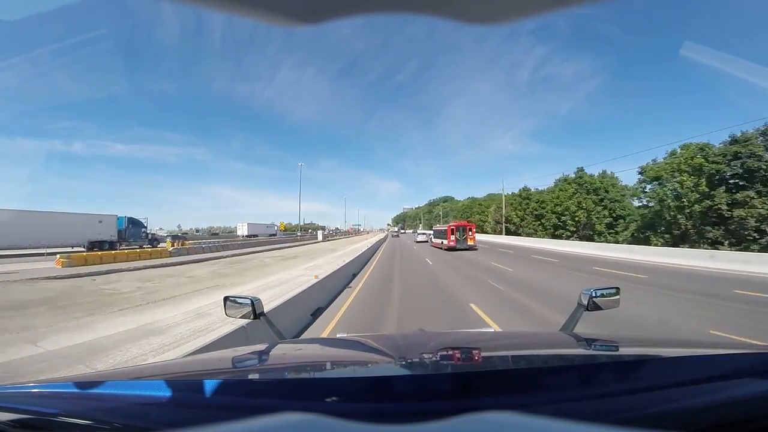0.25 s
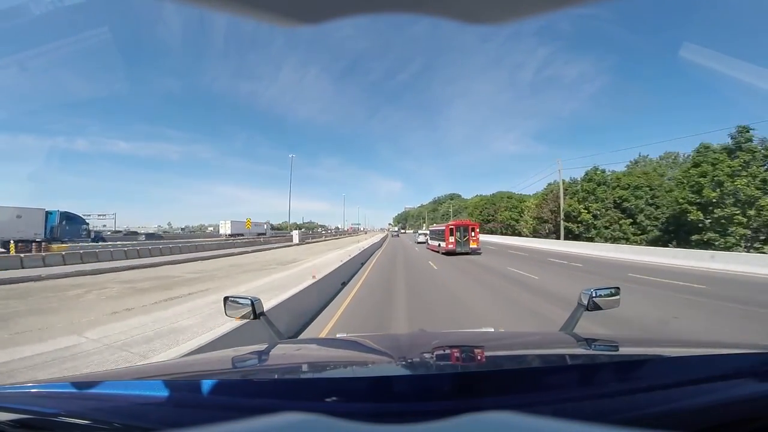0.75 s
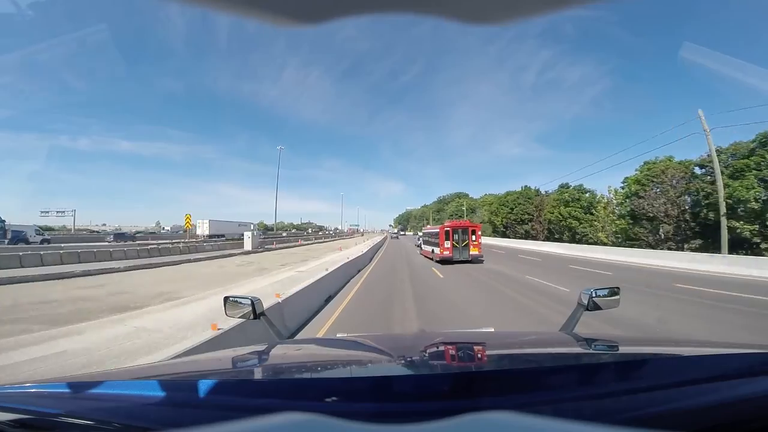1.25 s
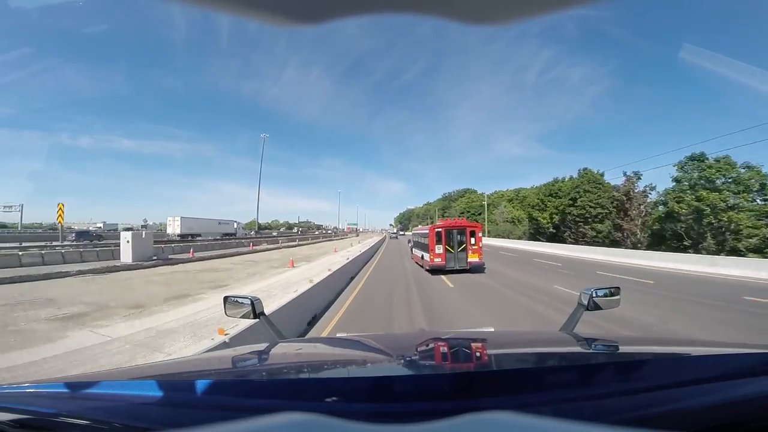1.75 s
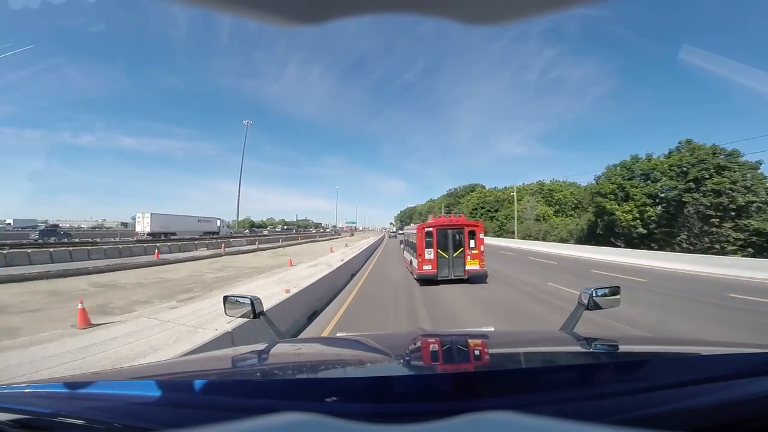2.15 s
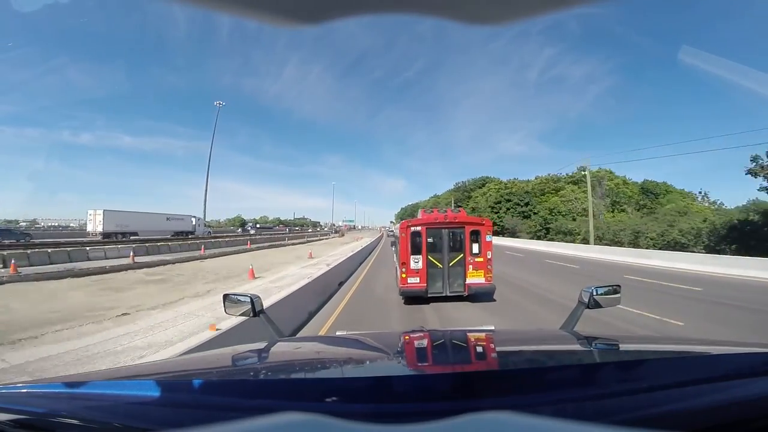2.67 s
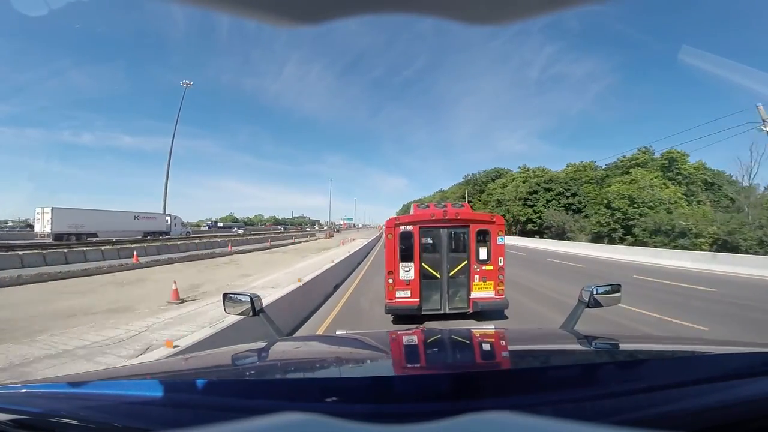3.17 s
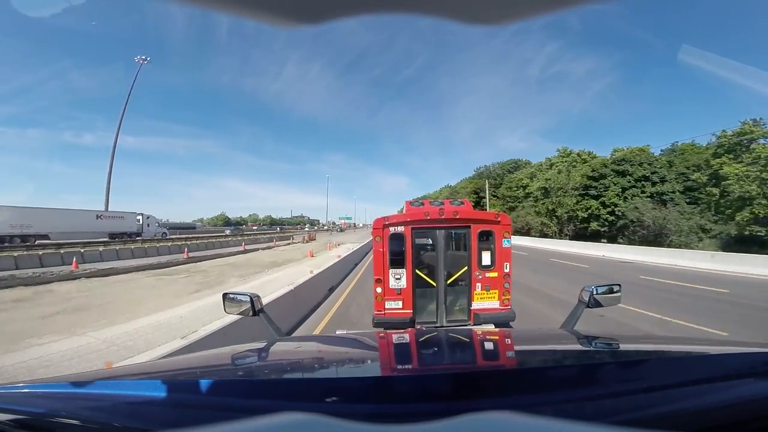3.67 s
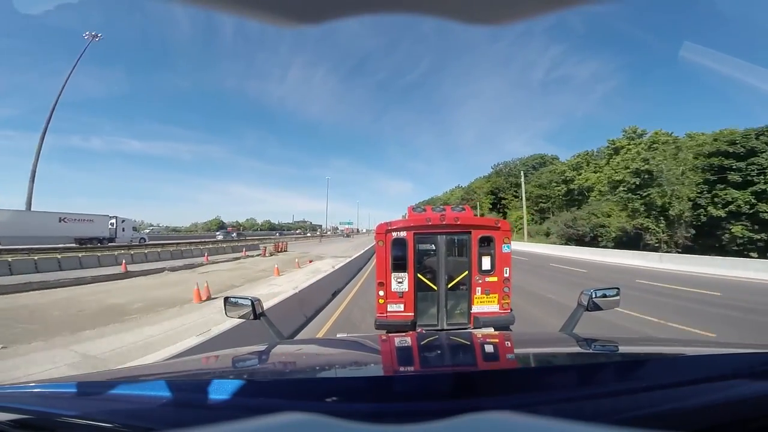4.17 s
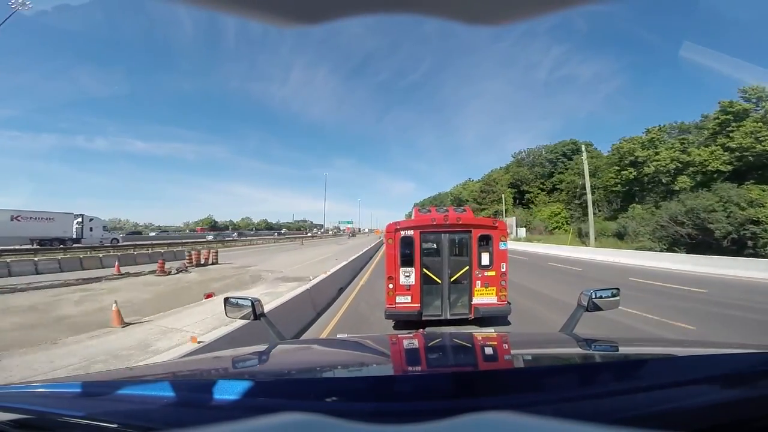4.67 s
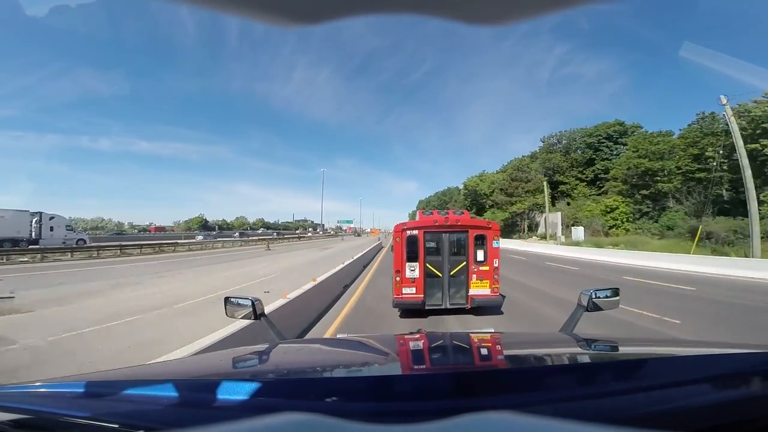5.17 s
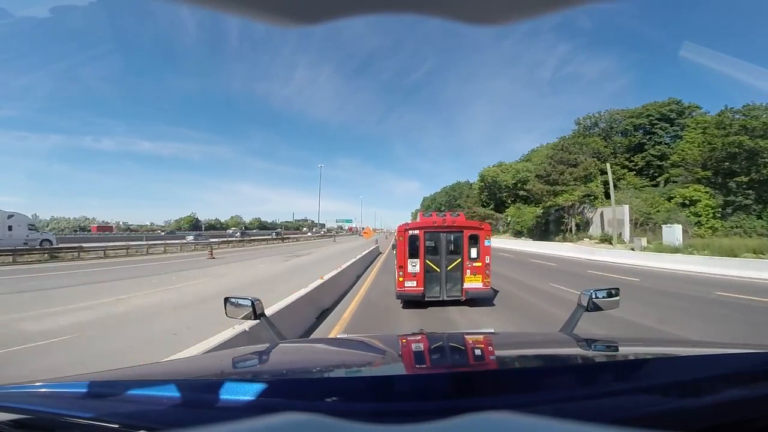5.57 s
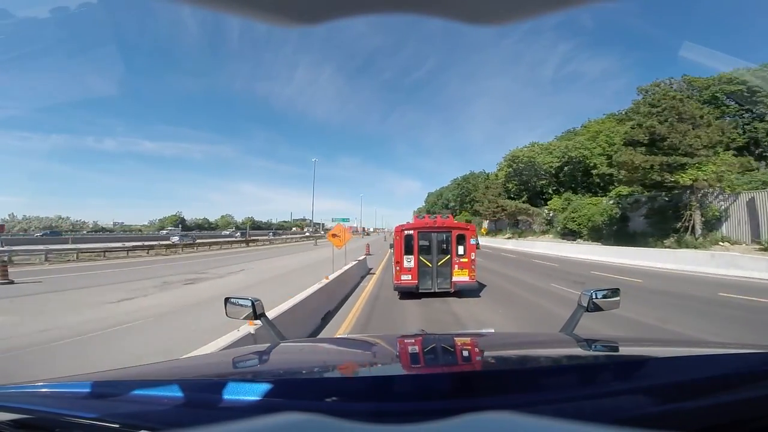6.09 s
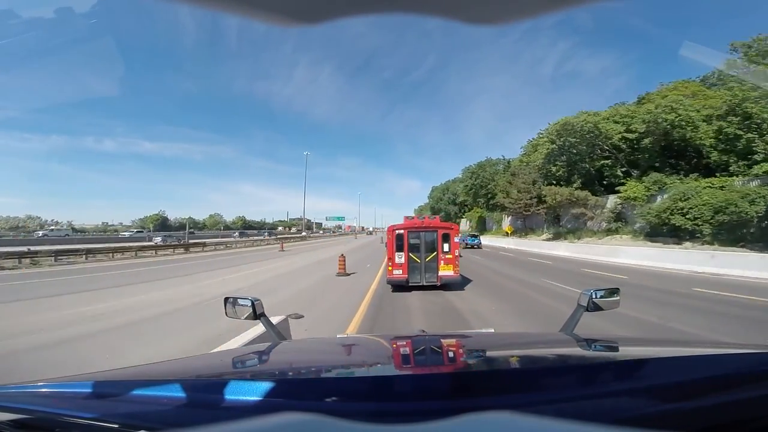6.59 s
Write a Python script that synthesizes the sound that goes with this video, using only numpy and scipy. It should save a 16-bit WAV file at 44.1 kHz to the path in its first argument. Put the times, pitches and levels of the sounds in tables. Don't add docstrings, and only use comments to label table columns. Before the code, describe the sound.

Low, bassy highway rumble fills a closed truck cab, with soft thumps of air over bumps. Brakes give a faint squeak, a valve spits, and the roof horn chirps higher for an instant before locking onto a long, buzzing mid-pitched blast. A small chassis knock and chirp sit beneath it. The horn stops abruptly with an airy vent; engine and road return, close to the microphone.

```python
import sys
import numpy as np
from scipy import signal
from scipy.io import wavfile

SR = 44100
rng = np.random.default_rng(int(sys.argv[2]) if len(sys.argv) > 2 else 0)


def transcribe(u):
    v = np.clip(np.atleast_2d(u).T, -1, 1)
    q = np.round(v * 32767).astype(np.int16)
    wavfile.write(sys.argv[1], SR, q)


def makeup_ratio(level_db):
    decades = np.asarray(level_db, float) / 20
    return 10 ** decades


N = 301644
TIME = np.arange(N) / SR
VALVE_OPENS_S, NOTE_LOCKS_S, VALVE_SHUTS_S, NOTE_ENDS_S = 1.705, 1.747, 5.37, 5.525


def rms_one(x):
    return x / np.sqrt(np.mean(x ** 2) + 1e-20)


def in_time(rows):
    s, *columns = np.transpose(rows)
    return [np.interp(TIME, s, c) for c in columns]


def drift(rate):
    r = np.exp(-128 * np.pi * rate / SR)
    sparse = rng.standard_normal(N // 64 + 2002)
    slow = signal.lfilter([1], [1, -2 * r, r * r], sparse)[2000:]
    return np.interp(np.arange(N) / 64, np.arange(len(slow)), rms_one(slow))


def band(x, low_hz, high_hz, order=2):
    return signal.sosfilt(signal.butter(order, [low_hz, high_hz], "band", fs=SR, output="sos"), x)


def narrow_noise(hz, width_hz):
    r = np.exp(-np.pi * width_hz / SR)
    poles = [1, -2 * r * np.cos(2 * np.pi * hz / SR), r * r]
    return rms_one(signal.lfilter([1, 0, -1], poles, rng.standard_normal(N)))


def noise_bands(spectrum, low_hz, patchy_db):
    white, together = rng.standard_normal((2, N)), drift(5.3)
    hz_points, db_points = np.transpose(spectrum)
    edges = np.geomspace(low_hz, 17000, round(3 * np.log2(17000 / low_hz)))
    for k, (low, high) in enumerate(zip(edges, edges[1:])):
        hz = np.sqrt(low * high)
        level_db = np.interp(np.log(hz), np.log(hz_points), db_points)
        flicker_db = patchy_db * (0.76 * together + drift(9))
        yield hz, makeup_ratio(level_db + flicker_db) * band(white[k % 2], low, high)


def tone(row, partials=((1, 0),), rise=.3, fall=.4, glide=1, rough_db=0):
    edge_db = 26
    s, length, from_hz, to_hz, top_db = row
    span = slice(int(s * SR), int((s + length) * SR))
    part = (TIME[span] - s) / length
    under = np.clip(np.maximum(1 - part / rise, 1 - (1 - part) / fall), 0, 1)
    hz = np.interp(part, [0, glide], [from_hz, to_hz])
    phase = 2 * np.pi * np.cumsum(hz) / SR + 0.16 * rough_db * drift(70)[span]
    level = np.sqrt(2) * makeup_ratio(top_db - edge_db * under + rough_db * drift(90)[span])
    out = np.zeros(N)
    out[span] = level * sum(makeup_ratio(db) * np.sin(k * phase) for k, db in partials)
    return out


def horn(fade_db=1.4, flicker_db=0.0791, swing=0.39, spread=.075):
    # multiple, level/dB, lean/(dB/s), crossing t/s, gain/dB
    overtones = [(1, -12, 0.7, 5.2, -2), (2, -34, -2.5, 2.7, -7), (3, -38, -5.0, 5.2, 15),
                 (4, -29, -2.1, 1.9, -4), (5, -28, -1.8, 4.5, -7), (6, -29, -2.5, 2.2, -6),
                 (7, -28, -1.5, 2.7, -4), (8, -23, -0.5, 3.6, -4), (9, -45, -0.1, 2.2, 12),
                 (10, -36, 1.9, 2.3, -4), (11, -47, 7.2, 2.1, 21), (12, -38, -0.7, 5.1, -8),
                 (13, -42, 0.9, 3.1, 4), (14, -40, -0.1, 3.3, 3), (15, -47, -1.4, 2.7, 4),
                 (16, -49, -3.0, 2.4, 2), (17, -43, -0.8, 4.7, -17), (18, -51, 0.9, 1.9, 9),
                 (19, -46, 0.0, 3.6, 4), (20, -50, 4.5, 2.1, 11), (21, -50, -2.3, 2.1, -8),
                 (22, -50, 1.5, 5.2, -4), (23, -52, 1.6, 5.0, -13), (24, -59, -1.7, 2.8, 2)]
    # t/s, level/dB
    blow = [
        (1.78, -10),
        (2.05, -13.5),
        (2.39, -11.5),
        (2.59, -13),
        (4.1, -11),
        (4.2, -12),
        (4.61, -11),
        (5.28, -13),
        (5.34, -11.5),
    ]
    # multiple, level/dB
    bright = [(25, 3), (28, 3), (31, 6), (32, 4), (33, 5), (35, 12), (44, 4), (46, 3), (47, 3), (49, 8)]
    # f/Hz, level/(dB per Hz)
    air = [(800, -2), (1500, -5.5), (2500, -8), (4000, -17), (6000, -19.5), (8500, -29), (12000, -37),
           (15300, -36)]
    closest_s, near_s = 3.6, .5
    hiss_db = -39.5

    span = slice(int(VALVE_OPENS_S * SR), int(NOTE_ENDS_S * SR))
    t = TIME[span]
    early, late = np.maximum(NOTE_LOCKS_S - t, 0), np.maximum(t - VALVE_SHUTS_S, 0)
    hz = 284.45 - .22 * (t - t[0])
    hz = hz + 260 * np.maximum(1.77 - t, 0)
    hz = hz + 19 * np.minimum(late / .12, 1)
    phase = 2 * np.pi * np.cumsum(hz) / SR
    phase = phase + .007 * drift(60)[span]

    upper = []
    first = len(overtones) + 1
    for k in range(first, 54):
        upper.append((k, -60 - 14 * np.log2(k / first) + dict(bright).get(k, 0), 0, 0, 0))

    def gate_db(k):
        return -330 * k ** 0.55 * early - 83 * k ** 0.75 * late

    note = 0
    for k, db, lean, crossing, near_db in list(overtones) + upper:
        scatter = .06 if k < 9 else 1
        lag = 2 * np.pi * (spread * k * k + scatter * rng.random())
        wander_db = fade_db * min(np.log(k) / 2, 1.2) * drift(3.07)[span]
        wander_db = wander_db + flicker_db * min(k, 24) * drift(26)[span]
        echo_db = near_db * np.exp(-((t - crossing) / near_s) ** 2)
        held_db = db + lean * (t - closest_s) + echo_db + wander_db
        if k == 1:
            held_db = in_time(blow)[0][span]
        echo_phase = swing * drift(1.0)[span] * (k > 1)
        note = note + makeup_ratio(held_db + gate_db(k)) * np.cos(k * phase - lag + echo_phase)

    hiss = rms_one(sum(noise for _, noise in noise_bands(air, 850, patchy_db=1.7)))[span]
    hiss = hiss * (1 + 0.11 * np.cos(phase))
    edge = np.minimum(np.arange(len(phase)), np.arange(len(phase))[::-1]) / (.015 * SR)
    out = np.zeros(N)
    out[span] = (-np.sqrt(2) * note + makeup_ratio(hiss_db + gate_db(14)) * hiss) * np.clip(edge, 0, 1)
    return out


def horn_transients():
    # t/s, length/s, start f/Hz, end f/Hz, level/dB
    overblow = (1.700, .066, 782, 754, -7.5)
    overblow_high = (1.701, .035, 2000, 1900, -22)
    overblow_mid = (1.708, .057, 1220, 1185, -25)
    sag_third = (5.35, .1, 850, 892, -22.5)
    sag_second = (5.36, .1, 565, 592, -24)
    fighting = tone(overblow_high, rise=.25, fall=.5, rough_db=6)
    fighting = fighting + tone(overblow_mid, rise=.3, fall=.35, rough_db=4)
    sagging = tone(sag_third, rise=.3, fall=.3, rough_db=1.5)
    sagging = sagging + tone(sag_second, ((1, -1), (2, -7.5)), rise=.4, fall=.45, rough_db=2)
    return tone(overblow, rise=.16, fall=.6, glide=.45, rough_db=1) + fighting + sagging


def puffs():
    # t/s, level/dB, t60/s, low f/Hz, high f/Hz
    spits = [
        (1.498, -48, .06, 5000, 10000),
        (1.613, -20, 0.13, 2500, 6400),
        (1.64, -40, .06, 3000, 6000),
        (1.66, -46, .06, 4000, 14000),
        (1.676, -20.5, .11, 1200, 3420),
        (1.678, -45, .06, 4000, 10000),
        (5.345, -35, .03, 4000, 12000),
        (5.351, -23.5, 0.06, 4000, 13900),
        (5.352, -17, 0.15, 1200, 3500),
    ]
    soft_puffs = [
        (.72, -47, .08, 3000, 12000),
        (1.475, -49, .06, 5000, 13000),
        (1.617, -37, 0.13, 10000, 15000),
        (1.62, -17.5, 0.038, 2600, 3840),
        (1.712, -25, .19, 1000, 2600),
        (1.727, -15.5, .11, 900, 2580),
    ]
    knocks = [
        (3.85, -31, .3, 600, 900),
        (3.955, -26, .15, 450, 900),
        (3.96, -29, .15, 905, 1500),
    ]
    out, age = np.zeros(N), np.arange(SR // 2) / SR
    for rows, rise_s in (spits, 0.002), (soft_puffs, 0.0077), (knocks, 0.029):
        for s, db, t60, low_hz, high_hz in rows:
            noise = band(rng.standard_normal(SR // 2), low_hz, high_hz, order=1)
            noise = rms_one(band(noise, low_hz / 2, min(0.51 * high_hz, 18000), order=1))
            decay = makeup_ratio(-60 * np.maximum(age - rise_s, 0) / t60)
            shape = np.minimum(age / rise_s, 1) ** 2 * decay
            start = int(s * SR)
            out[start:start + SR // 2] += makeup_ratio(db) * shape * noise
    return out


def brakes():
    # t/s, length/s, start f/Hz, end f/Hz, level/dB
    squeak = (1.335, .095, 2560, 2715, -3)
    squeak_ring = (1.358, .044, 5340, 5440, -33)
    whines = [
        (3.0, .3, 6700, 6700, -56),
        (3.4, .55, 6670, 6700, -56),
    ]
    # multiple, level/dB
    squeak_partials = [(1, -36), (2, -53), (3, -52), (4, -54), (5, -66)]
    out = tone(squeak, squeak_partials, rise=.3, fall=.3, glide=.45, rough_db=2.5)
    out = out + tone(squeak_ring, rise=.2, fall=.55, rough_db=3.5)
    return out + sum(tone(row, rise=.6, fall=.3, rough_db=3) for row in whines)


def chassis():
    # t/s, length/s, start f/Hz, end f/Hz, level/dB
    chirp = (3.85, .075, 2450, 2300, -24)
    groan = (3.82, .215, 790, 530, -28.5)
    out = tone(chirp, ((1, 0), (2, -22), (3, -36)), rise=.12, fall=.4, glide=.4, rough_db=2.5)
    return out + tone(groan, rise=.8, fall=.15, rough_db=4)


def powertrain():
    # t/s, length/s, start f/Hz, end f/Hz, level/dB
    turbo = (6.45, .39, 10050, 10650, -70)
    pull = (5.6, 1.24, 305, 316, -29)
    return tone(turbo, rise=.5, fall=.02, rough_db=1.5) + tone(pull, rise=.5, fall=.02, rough_db=3)


def road():
    # f/Hz, level/(dB per Hz)
    roar = [(30, -9), (40, -6), (60, -10), (100, -6), (156, -6), (200, -11.5), (320, -6.5), (480, -10),
            (620, -10.5), (800, -12), (1100, -21), (2300, -23.5), (4600, -40), (9000, -55.5), (15000, -104)]
    # f/Hz, width/Hz, level/dB over low roar
    hum_modes = [
        (103.3, 2.9, -11),
        (156, 15.5, -12.5),
        (313.4, 5.5, -17),
        (577, 5.5, -21.5),
        (665, 22, -49),
        (838, 10, -25),
        (2380, 4.5, -36),
    ]
    # t/s, level/dB
    speed = [
        (0, -17.5),
        (.35, -15),
        (.8, -18.5),
        (1.7, -18),
        (3.2, -20),
        (4.3, -22.5),
        (5.35, -20.5),
        (5.9, -20),
        (6.35, -17.5),
        (6.84, -19),
    ]
    # t/s, level/dB, half length/s
    bumps = [(0.017, -17, 0.085), (.38, -20, 0.056), (.7, -20, 0.064), (.88, -12, 0.036),
             (1.02, -11.5, 0.067), (1.22, -21, 0.074), (1.41, -19, .04), (1.64, -16, 0.065),
             (2.45, -22, 0.065), (2.82, -25, 0.045), (3.04, -23, .05), (3.21, -24, .04), (3.475, -25, .09),
             (3.805, -22, 0.073), (4.2, -23.5, .1), (4.5, -21, 0.27), (4.87, -17, .04),
             (5.078, -22.5, 0.17), (5.502, -27.5, 0.28), (5.92, -17.5, 0.16), (6.202, -15.5, 0.14),
             (6.463, -15, 0.097), (6.75, -14.5, 0.14)]
    duck_db, attack_s, release_s = 8.5, 0.039, 0.46
    upper_roar_db, upper_follows = -27, 0.92
    boom_hz, boom_width_hz, boom_floor_db = 28.3, 2.49, -36

    ducked = -np.expm1(-np.maximum(TIME - VALVE_OPENS_S, 0) / attack_s)
    ducked = ducked * np.exp(-np.maximum(TIME - VALVE_SHUTS_S, 0) / release_s)
    roar_db = in_time(speed)[0] - duck_db * ducked
    bands = list(noise_bands(roar, 33.97, patchy_db=1.2))
    whole = sum(noise for _, noise in bands)
    low_db = roar_db - 20 * np.log10(band(whole, 50, 230, order=4).std())
    upper_db = upper_roar_db + upper_follows * (roar_db - roar_db[0])
    upper_db = upper_db - 20 * np.log10(band(whole, 340, 520, order=4).std())
    out = 0
    for hz, noise in bands:
        upper = np.clip(np.log2(hz / 200), 0, 1)
        out = out + noise * makeup_ratio((1 - upper) * low_db + upper * upper_db)

    hums = sum(makeup_ratio(db) * narrow_noise(hz, width) for hz, width, db in hum_modes)
    wobble = np.cumsum(boom_hz + boom_width_hz * drift(4.27))
    boom = np.sqrt(2) * np.sin(2 * np.pi * wobble / SR) * makeup_ratio(1.9 * drift(12))
    pumping = makeup_ratio(boom_floor_db)
    pumping = pumping + sum(makeup_ratio(db) * np.exp(-((TIME - s) / half) ** 2) for s, db, half in bumps)
    return out + makeup_ratio(roar_db) * hums + pumping * boom


def scene():
    mix = horn() + horn_transients() + puffs() + brakes() + chassis() + powertrain() + road()
    return mix[None]


def top_cut(x):
    return signal.sosfilt(signal.butter(12, 15410, fs=SR, output="sos"), x)


def record(dry):
    straight = np.clip(dry, -.7, .7)
    rounded = straight + .2 * np.tanh((dry - straight) / .2)
    low_pass = signal.cheby2(14, 60, 15650, fs=SR, output="sos")
    return top_cut(signal.sosfilt(low_pass, rounded))


dry = scene()
out = record(dry)
transcribe(out)
```